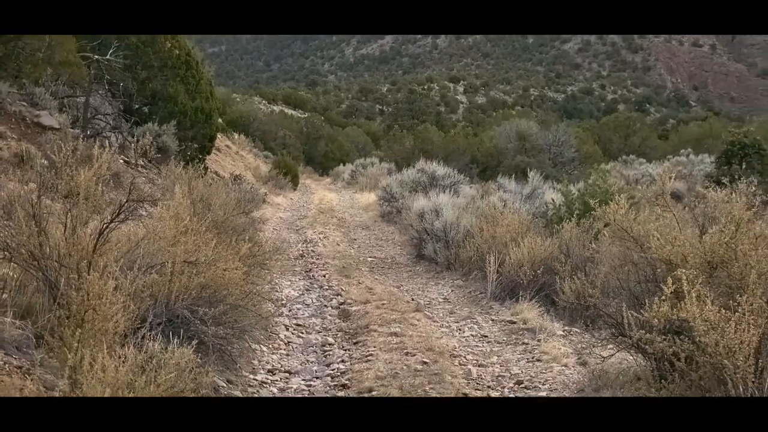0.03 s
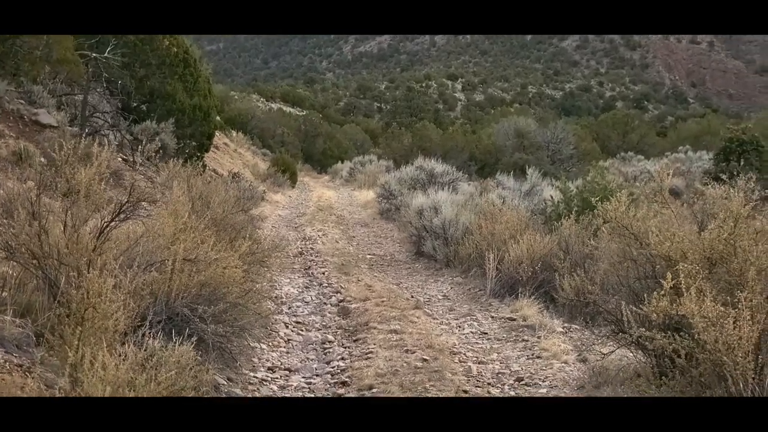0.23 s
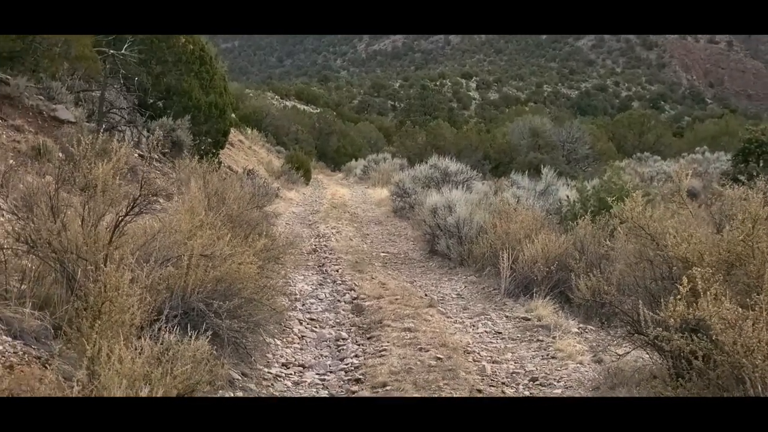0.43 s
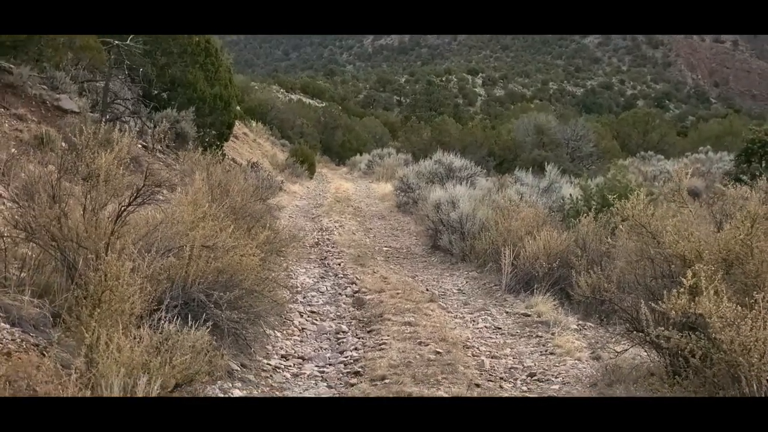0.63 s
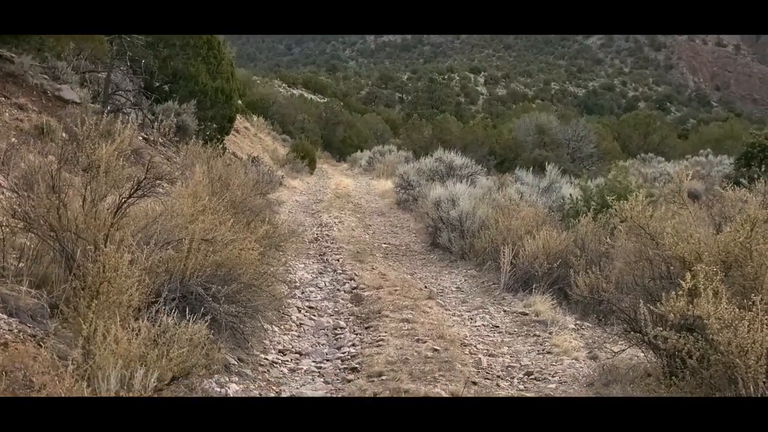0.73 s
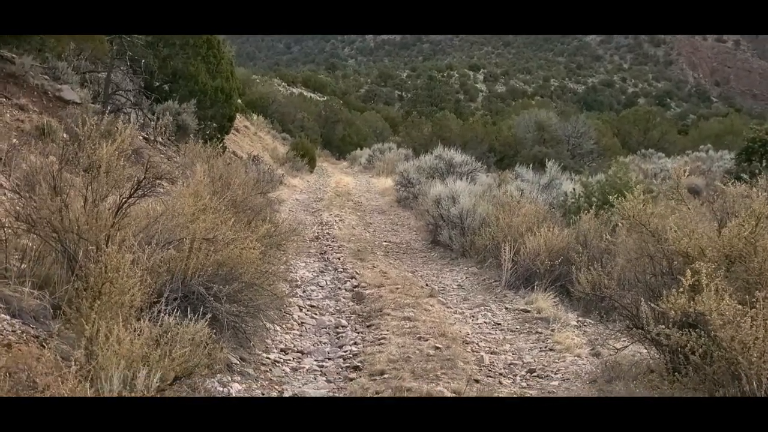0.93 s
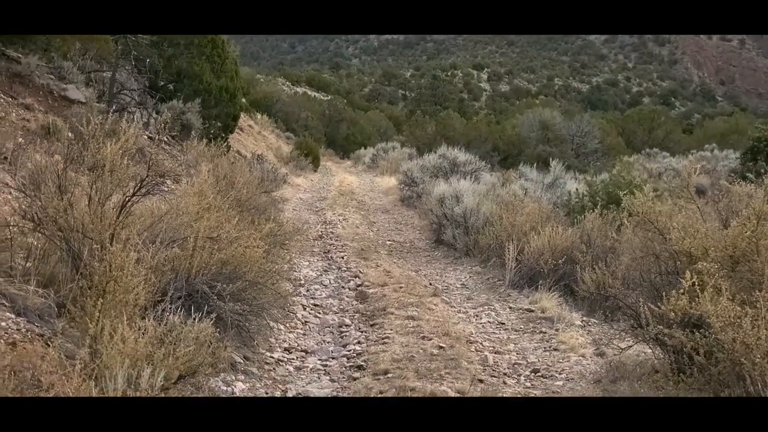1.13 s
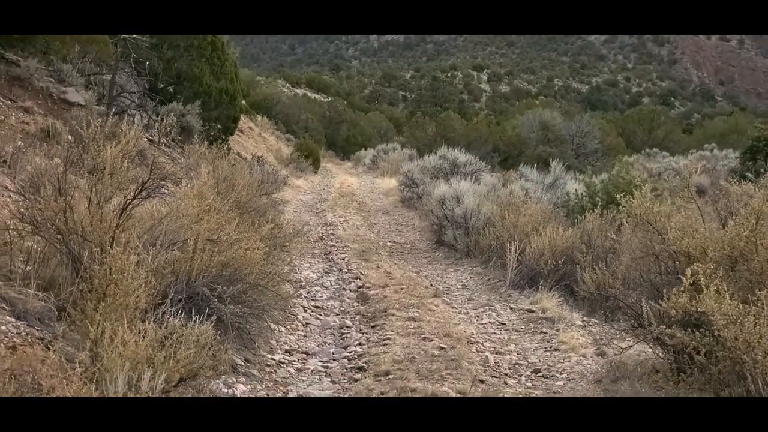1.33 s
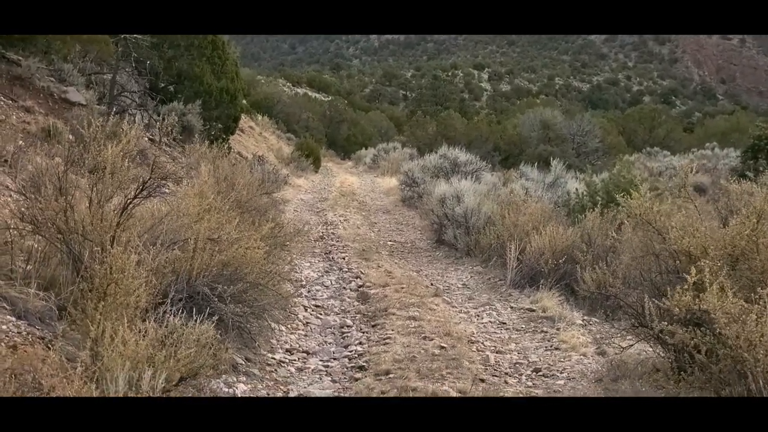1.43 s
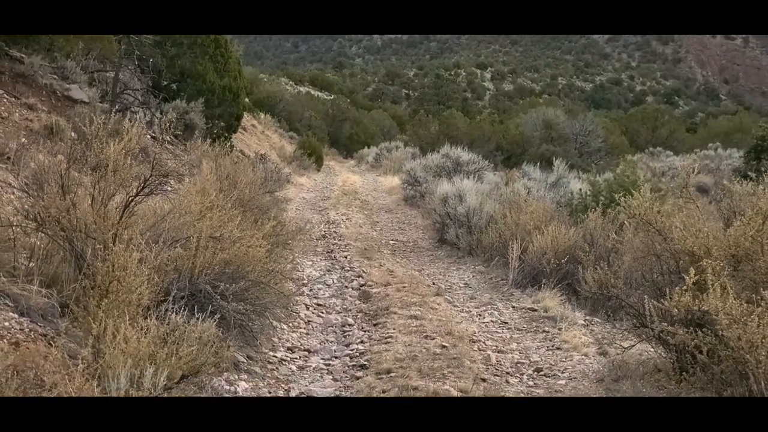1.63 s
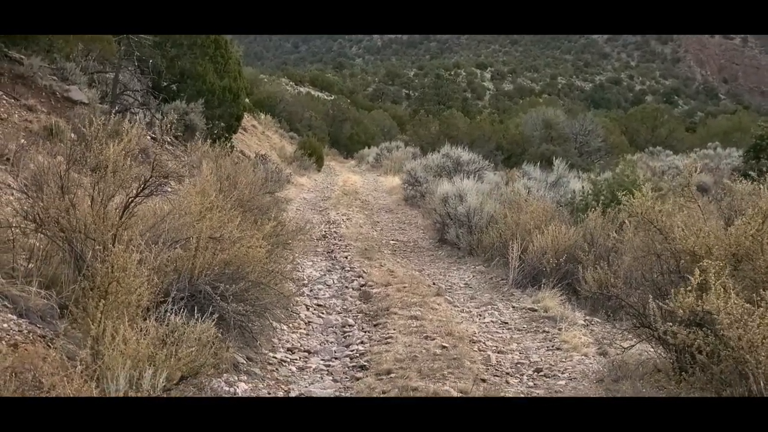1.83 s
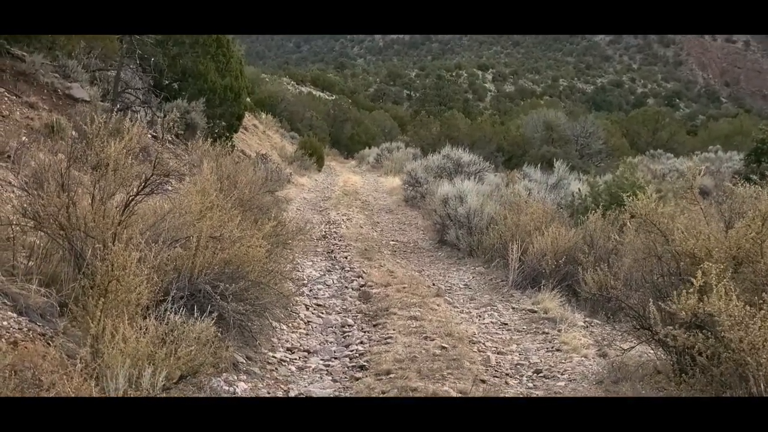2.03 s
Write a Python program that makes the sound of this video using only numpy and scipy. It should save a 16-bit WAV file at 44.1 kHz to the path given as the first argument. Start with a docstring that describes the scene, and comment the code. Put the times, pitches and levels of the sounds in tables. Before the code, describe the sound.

Gusty wind buffets a small microphone with low thumps, flutters and pops on an open dirt road

```python
"""Gusty wind buffets the two ports of a small microphone on a rocky dirt road in open country.
Shaped noise gives its rumble and flutter; eddies burst on each port as thumps and flutters, and damped
sines as pops. A scraping rustle, perhaps a truck on stones, is noise that dies away. Dry brush is
high noise over dull air, a few twigs or pebbles tick as noise bursts, and a far bird peeps as gliding sines."""
import sys
import numpy as np
from scipy import signal
from scipy.fft import rfft, irfft
from scipy.io import wavfile
from scipy.ndimage import uniform_filter1d

SR = 44100
rng = np.random.default_rng(int(sys.argv[2]) if len(sys.argv) > 2 else 0)


def gain_from_db(level_db):
    """Turn a decibel level (scalar or array-like) into a linear amplitude factor."""
    decades = np.asarray(level_db, float) / 20
    return 10 ** decades


def generate_wav(sig):
    """Save sig (samples, or channels by samples) to the path in sys.argv[1] as 16-bit PCM at SR."""
    pcm = np.round(np.clip(np.atleast_2d(sig).T, -1, 1) * 32767).astype(np.int16)
    wavfile.write(sys.argv[1], SR, pcm)


N = 92169  # samples

# wind between the bursts: (time [s], rumble level [dB], flutter level [dB]), before low cuts and lumps
GUST_LEVELS = [(.02, -36, -48.5), (.35, -43, -55), (0.549, -43, -63.5), (.78, -40.5, -57),
               (.95, -45.5, -68), (1.16, -50.5, -64), (1.399, -42.5, -69), (1.62, -48, -70.5),
               (2.06, -53.5, -62)]
LUMP_DB, LUMP_S = 4.5, 0.018  # rms unevenness of the wind, smoothing window


def evened(x):
    """Scales to an rms of one."""
    return x / np.sqrt(np.mean(x ** 2) + 1e-20)


def read(points, hz):
    """Reads a spectrum table on a log-frequency axis."""
    f, value = np.transpose(points)
    return np.interp(np.log(hz + 1), np.log(f + 1), value)


def add(mix, start_s, sound):
    """Mixes a sound in at a time, cut at the end of the mix."""
    part = mix[..., max(round(start_s * SR), 0):][..., :sound.shape[-1]]
    part += sound[..., :part.shape[-1]]


def coloured(points):
    """Two unrelated noises with the spectrum of a table, rms one."""
    gain = gain_from_db(read(points, np.fft.rfftfreq(N, 1 / SR)))
    white = rng.standard_normal((2, N))
    return evened(irfft(rfft(white) * gain, N))


def drift(window_s):
    """Slow chance of rms one, one track a port: noise smoothed twice."""
    size = round(window_s * SR)
    once = uniform_filter1d(rng.standard_normal((2, N)), size)
    return evened(uniform_filter1d(once, size))


def wind_rumble():
    """Low turbulence noise follows the gust in lumps; a wind suppressor cuts it on each port at times."""
    # (frequency [Hz], relative density [dB])
    rumble_spectrum = [(12, -59), (20, -12.5), (75, 0), (140, -13), (250, -15.5), (400, -67)]
    # left port, then right: (start [s], end [s])
    port_low_cuts = [
        [(0, .035), (.27, .335), (.36, .4), (.9, .975), (1.02, 1.06), (1.58, 1.62), (1.76, 1.805),
         (2.015, 2.09)],
        [(.47, .622), (1.03, 1.115), (1.29, 1.312)],
    ]
    low_cut_db, low_cut_edge_s = -28, 0.01
    t = np.arange(N) / SR
    time_s, rumble_db, _ = np.transpose(GUST_LEVELS)
    cut = np.array([sum((t > a) & (t < b) for a, b in spans) for spans in port_low_cuts], float)
    cut = uniform_filter1d(cut, round(low_cut_edge_s * SR))
    level_db = np.interp(t, time_s, rumble_db) + low_cut_db * cut + LUMP_DB * drift(LUMP_S)
    return coloured(rumble_spectrum) * gain_from_db(level_db)


def wind_flutter():
    """Turbulence noise above the rumble that follows the gust in quicker lumps."""
    # (frequency [Hz], relative density [dB])
    flutter_spectrum = [(150, -44.5), (290, 1), (1100, -32), (2500, -77.5)]
    time_s, _, flutter_db = np.transpose(GUST_LEVELS)
    level_db = np.interp(np.arange(N) / SR, time_s, flutter_db) + LUMP_DB * drift(LUMP_S / 2)
    return coloured(flutter_spectrum) * gain_from_db(level_db)


def scrape():
    """A gritty noise wash with three ringing bands, both dying away exponentially."""
    # (frequency [Hz], relative density [dB])
    wash_spectrum = [(650, -23.5), (1620, 0.5), (2400, -10), (3800, -25.5), (7000, -32.5), (9000, -71.5)]
    # (centre [Hz], width at half amplitude [Hz], relative level [dB])
    ring_bands = [(1625, 220, 0), (2380, 260, -2), (3400, 440, -5)]
    wash_db, wash_t60_s = -62, 2.25  # start level, decay
    ring_db, ring_t60_s = -61, 0.9  # start level before the bleed, decay
    grit_db = 1.5
    t = np.arange(N) / SR
    hz = np.geomspace(800, 6000, num=400)
    rings = sum(gain_from_db(db) / (1 + (2 * (hz - f) / width_hz) ** 4) for f, width_hz, db in ring_bands)
    ringing = coloured(np.c_[hz, 20 * np.log10(rings)])
    ringing = ringing + 0.35 * ringing[::-1]  # each port bleeds into the other
    wash_level_db = wash_db - 60 * t / wash_t60_s + grit_db * drift(0.0074)
    ring_level_db = ring_db - 60 * t / ring_t60_s + grit_db * drift(0.0055)
    return coloured(wash_spectrum) * gain_from_db(wash_level_db) + ringing * gain_from_db(ring_level_db)


def air_and_brush():
    """Dull far air and the rising and falling hiss of dry brush: noises tilted between the ports."""
    # (frequency [Hz], relative density [dB])
    air_spectrum = [(180, -33.5), (300, -7.5), (600, -16.5), (1060, -20), (1710, -24.5), (2200, -31.5),
                    (7000, -45), (9000, -72)]
    # (frequency [Hz], relative density [dB])
    hiss_spectrum = [(2350, -25), (7600, -7), (8600, -0.5), (10000, 0.5), (10600, -5.5), (14000, -3),
                     (15300, 6), (15700, 0.5), (15780, -70.5)]
    # (time [s], level [dB]), before swell and tilt
    hiss_levels = [(.2, -74), (.55, -78.5), (.85, -76.5), (1.05, -83), (1.45, -78), (2.06, -81)]
    # (frequency [Hz], left minus right [dB])
    side_tilt = [(2000, -3), (6500, 3), (9000, -8.5), (12000, -1)]
    air_db, swell_db = -68, 1.2  # before swell and tilt; rms of the swell
    hiss_db = np.interp(np.arange(N) / SR, *np.transpose(hiss_levels)) + swell_db * drift(0.022)[0]
    air = coloured(air_spectrum) * gain_from_db(air_db + swell_db * drift(0.057))
    both = air + coloured(hiss_spectrum) * gain_from_db(hiss_db)
    tilt_db = read(side_tilt, np.fft.rfftfreq(N, 1 / SR)) / 2
    return irfft(rfft(both) * gain_from_db([tilt_db, -tilt_db]), N)


def tick(level_db, pitch_hz, pan_db):
    """A dry snap: a dying burst of band noise."""
    t60_s, width_hz, size = 0.025, 3000, 2048
    t = np.arange(size) / SR
    hz = np.fft.rfftfreq(size, 1 / SR)
    band = 1 / (1 + (2 * (hz - pitch_hz) / width_hz) ** 2)
    burst = evened(irfft(rfft(rng.standard_normal((2, size))) * band))
    sides = gain_from_db([[pan_db / 2], [-pan_db / 2]])
    return burst * gain_from_db(level_db - 60 * t / t60_s) * sides


def ticks(mix):
    """Twigs or pebbles snap at set times, each as band noise."""
    # (start [s], starting rms level before pan [dB], pitch [Hz], left minus right [dB])
    tick_rows = [(.0204, -62, 5800, 3), (.35, -69, 9000, -4), (.766, -72, 6000, 0), (.845, -73, 4000, -5),
                 (2.026, -69, 8640, -12)]
    for start_s, *settings in tick_rows:
        add(mix, start_s, tick(*settings))


def eddy(middle_s, width_s, level_db, pitch_hz, spread, steep):
    """A short swirl of pressure: ragged noise around one pitch, swelling and dying."""
    block = 8192
    stretch, ragged_db, ragged_cycles = 1.4, 1.5, 1.87  # length per width, unevenness, its window
    low_cut = 0.45  # in pitches
    ratio = np.fft.rfftfreq(block, 1 / SR)[1:] / pitch_hz
    band = 1 / np.sqrt(1 + ((ratio - 1 / ratio) / spread) ** 2)
    band = band / (1 + (ratio / 2) ** steep) / (1 + (low_cut / ratio) ** 2)
    band = np.r_[0, band]  # no constant pressure
    size = min(round(stretch * width_s * SR), block)
    noise = rng.standard_normal((2, block))
    window = np.hanning(round(ragged_cycles * SR / pitch_hz))
    ragged = gain_from_db(ragged_db * evened(signal.fftconvolve(noise[1], window, "same")))
    swirl = (irfft(rfft(noise[0]) * band) * ragged)[:size]
    swirl = swirl * np.sin(np.pi * np.arange(size) / size) ** 1.28
    return middle_s - size / SR / 2, gain_from_db(level_db) * evened(swirl)


def flutter_bursts(mix):
    """Eddies of narrow band, each with its own pitch, flutter on each port."""
    # left port, then right: (middle [s], width before stretch [s], rms level [dB], pitch [Hz])
    flutter_rows = [
        [(0.072, 0.042, -30.5, 398), (0.18, 0.061, -40.5, 365), (0.241, 0.034, -46.5, 351),
         (0.626, 0.025, -47.5, 420), (0.707, 0.025, -40.5, 338), (0.805, 0.027, -39, 307),
         (0.861, 0.049, -44, 317), (1.242, 0.055, -46.5, 322), (1.36, 0.043, -45.5, 306),
         (1.436, 0.051, -49.5, 330), (1.484, 0.049, -50, 427), (2.008, 0.022, -50.5, 430)],
        [(0.095, 0.039, -31, 328), (0.194, 0.095, -49.5, 355), (0.35, 0.028, -46, 302),
         (0.635, 0.05, -46.5, 315), (0.702, 0.024, -48.5, 339), (1.413, 0.061, -55.5, 323),
         (2.083, 0.017, -43, 278)],
    ]
    for port, rows in zip(mix, flutter_rows):
        for row in rows:
            add(port, *eddy(*row, spread=0.26, steep=3.7))


def thumps(mix):
    """Low eddies of wide band thump on each port."""
    # left port, then right: (middle [s], width before stretch [s], rms level [dB])
    thump_rows = [
        [(0.075, 0.029, -25.5), (0.119, 0.033, -28.5), (0.164, 0.017, -27.5), (0.19, 0.021, -25),
         (0.349, 0.019, -34.5), (0.451, 0.046, -35), (0.515, 0.023, -39), (0.653, 0.027, -39.5),
         (0.704, 0.019, -31.5), (0.806, 0.032, -30.5), (0.855, 0.03, -31.5), (1.084, 0.028, -40),
         (1.204, 0.018, -40.5), (1.262, 0.054, -37), (1.35, 0.022, -31.5), (1.418, 0.051, -31),
         (1.47, 0.06, -40), (1.878, 0.058, -38.5), (1.985, 0.035, -47.5)],
        [(0.095, 0.057, -20.5), (0.175, 0.052, -25), (0.221, 0.045, -29.5), (0.343, 0.083, -31.5),
         (0.439, 0.031, -31.5), (0.648, 0.032, -31.5), (0.712, 0.043, -29), (0.803, 0.039, -24),
         (0.838, 0.04, -29.5), (0.895, 0.021, -36.5), (1.231, 0.025, -34), (1.401, 0.056, -31),
         (1.481, 0.03, -33), (1.544, 0.059, -40.5), (1.785, 0.058, -39.5), (1.856, 0.032, -36.5),
         (2.082, 0.018, -33.5)],
    ]
    for port, rows in zip(mix, thump_rows):
        for row in rows:
            add(port, *eddy(*row, pitch_hz=78.9, spread=0.85, steep=2.016))


def pop(peak_db, pitch_hz):
    """A sudden push or pull on the port that rings for a cycle or two."""
    rise_cycles, ring_cycles = 0.5, 0.71  # time constants
    cycles = np.arange(2048) / SR * pitch_hz
    envelope = (1 - np.exp(-cycles / rise_cycles)) ** 2 * np.exp(-cycles / ring_cycles)
    ring = envelope * np.sin(2 * np.pi * cycles)
    push_or_pull = np.sign(rng.standard_normal())
    return push_or_pull * gain_from_db(peak_db) * ring / abs(ring).max()


def pops(mix):
    """Sharp pops of air on each port, as damped sines of either sign."""
    # left port, then right: (start [s], peak level [dB], pitch [Hz])
    pop_rows = [
        [(.136, -31.5, 470), (.346, -28.5, 402), (.612, -32.5, 335), (.669, -36.5, 520), (.797, -33, 384),
         (1.244, -27, 261), (2.021, -31.5, 445), (2.061, -40.5, 476)],
        [(.499, -34.5, 410), (.525, -38.5, 537), (.801, -27.5, 465), (1.246, -25.5, 322), (1.333, -46, 615),
         (1.356, -31, 342)],
    ]
    for port, rows in zip(mix, pop_rows):
        for start_s, *settings in rows:
            add(port, start_s, pop(*settings))


def peep(length_s, level_db, top_hz):
    """A thin wavering whistle that glides up, swells late and sags a little."""
    bend, top_at, sag, swell = 0.1, 0.66, 0.07, 2.2  # top_at: share of the length
    waver_db = 3
    u = np.arange(0, length_s, 1 / SR) / length_s
    arch = np.sin(np.pi * u ** (np.log(0.5) / np.log(top_at)))  # peaks at top_at
    glide = np.where(u < top_at, bend * (1 - u / top_at), sag * (u - top_at))
    phase_turns = rng.random((2, 1)) * 0.19  # differs between the ports
    turns = np.cumsum(top_hz * (1 - glide)) / SR + phase_turns
    waver = gain_from_db(level_db + waver_db * drift(0.01)[:, :len(u)])
    return waver * arch ** swell * np.sin(2 * np.pi * turns)


def bird(mix):
    """A far bird peeps, each call a gliding sine."""
    # (start [s], length [s], top amplitude before waver [dB], top pitch [Hz])
    peep_rows = [(.868, .116, -69, 2710), (1.0, .11, -84, 2660)]
    for start_s, *settings in peep_rows:
        add(mix, start_s, peep(*settings))


def scene():
    """Sums the wind, scrape, air, brush, ticks and bird on two ports."""
    mix = wind_rumble() + wind_flutter() + scrape() + air_and_brush()
    for source in (ticks, flutter_bursts, thumps, pops, bird):
        source(mix)
    return mix


def top_cut(x):
    """Nothing passes above the cut-off."""
    return signal.sosfilt(signal.butter(12, 16900, fs=SR, output="sos"), x)


def record(dry):
    """Processes the finished mix for output."""
    return top_cut(dry)


dry = scene()
out = record(dry)
generate_wav(out)
```